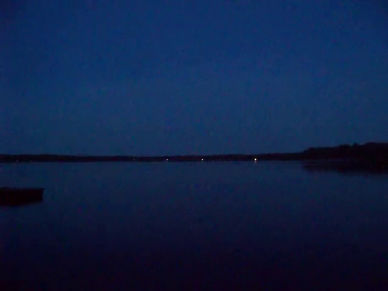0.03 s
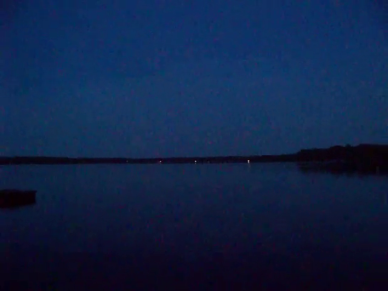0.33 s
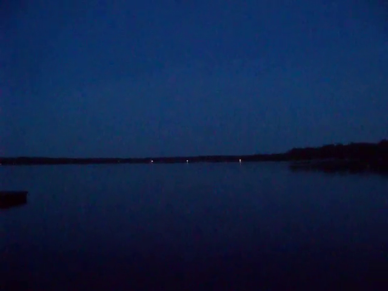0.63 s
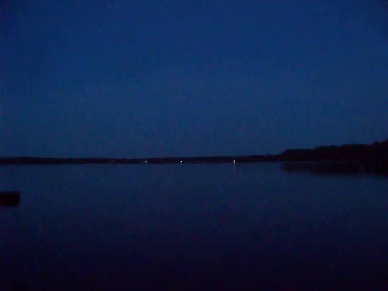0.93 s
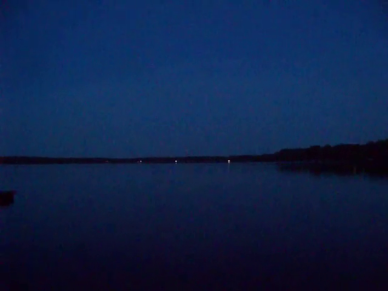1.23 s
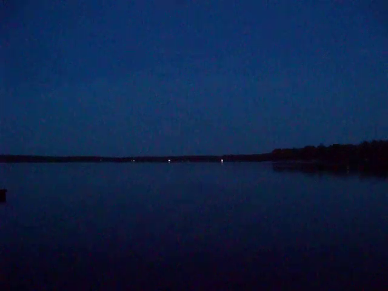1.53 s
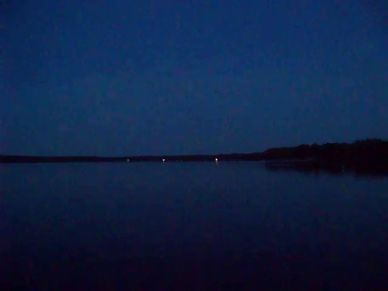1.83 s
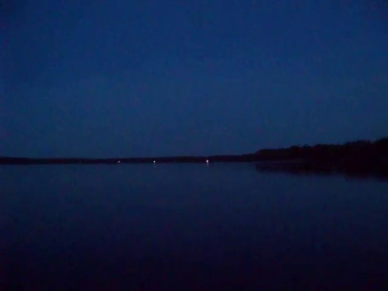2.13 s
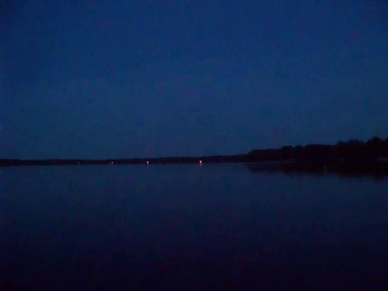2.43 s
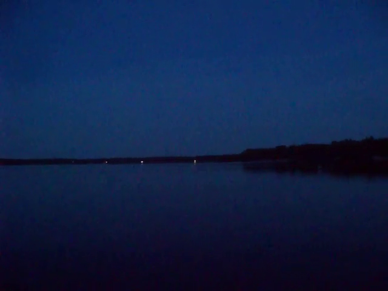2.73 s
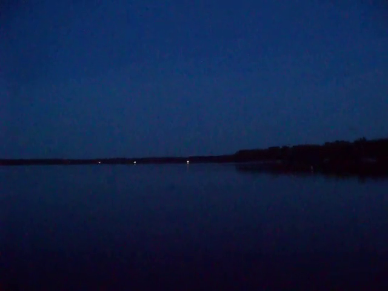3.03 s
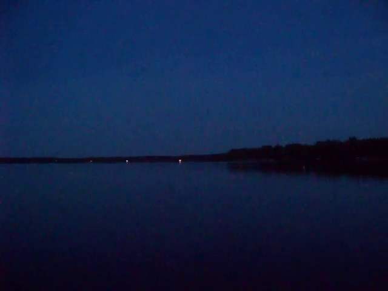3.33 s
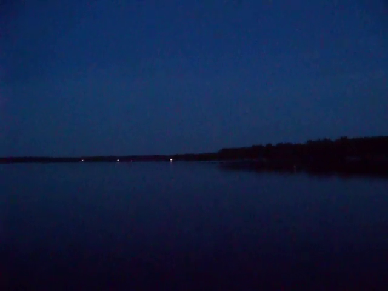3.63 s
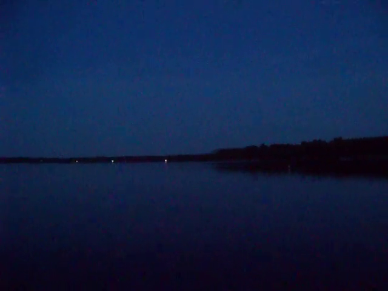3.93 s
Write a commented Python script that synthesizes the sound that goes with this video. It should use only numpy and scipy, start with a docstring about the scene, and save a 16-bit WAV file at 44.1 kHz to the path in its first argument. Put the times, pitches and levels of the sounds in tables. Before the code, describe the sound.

Two loons trade wavering calls that echo across a calm lake over faint hiss.

```python
"""A calm lake at dusk, where two loons trade tremolo calls, one pitched a little above the other.
Each call starts in a low, reedy register, then breaks upward into a nearly pure tone that warbles
about ten times a second, pitch and level sagging together. The wooded shores echo the calls
over a steady hiss, a faint hum and two small ticks."""
import sys
import numpy as np
from scipy import signal
from scipy.fft import rfft, irfft, next_fast_len
from scipy.io import wavfile
from scipy.ndimage import map_coordinates

SR = 44100
rng = np.random.default_rng(int(sys.argv[2]) if len(sys.argv) > 2 else 0)


def waveform_to_disk(signal):
    """Save audio, clipped to [-1, 1], as 16-bit WAV at the path in sys.argv[1]."""
    frames = np.transpose(np.atleast_2d(signal))
    scaled = np.clip(frames, -1, 1) * 32767
    samples = np.round(scaled).astype(np.int16)
    wavfile.write(sys.argv[1], SR, samples)


N = 176400


def amp(db):
    """Decibels to gain."""
    return 10 ** (np.asarray(db) / 20)


def unit_rms(x):
    """Scale to rms 1."""
    return x / np.sqrt(np.mean(x ** 2) + 1e-20)


def curve_at(points, hz):
    """Read (Hz, value) points on a log frequency axis."""
    point_hz, values = np.transpose(points)
    return np.interp(np.log(hz + 1), np.log(point_hz + 1), values)


def wobble(rate):
    """A smooth random curve with `rate` knots a second."""
    knots = rng.standard_normal(int(N * rate / SR) + 4)
    return map_coordinates(knots, [np.arange(N) * rate / SR])


def filtered(x, response):
    """Shape x with a response given as a function of Hz."""
    size = next_fast_len(N + SR // 2)
    return irfft(rfft(x, size) * response(np.fft.rfftfreq(size, 1 / SR)), size)[..., :N]


# Tone colour of the hiss. Each row: frequency in Hz, relative level in dB.
HISS_SPECTRUM = [(25, -7), (60, -1.5), (140, -0.5), (230, -3.5), (450, -1), (800, 1), (1500, -2.5),
                 (3000, -6), (5000, -8), (6600, -9), (7300, -13), (7900, -26.5), (8700, -35.5)]
# Stereo image of the hiss. Each row: frequency in Hz, left-right likeness (1 is mono).
HISS_LIKENESS = [(60, 0.24), (160, 0.51), (430, 0.61), (1150, 0.077), (3060, 0.43), (8190, 0.52)]


def hiss(level_db=-52.5):
    """A steady bed of noise whose stereo width varies with frequency."""
    def mid_side_gains(hz):
        width = np.arccos(np.clip(curve_at(HISS_LIKENESS, hz), -1, 1)) / 2
        return amp(curve_at(HISS_SPECTRUM, hz)) * [np.cos(width), np.sin(width)]
    mid, side = filtered(rng.standard_normal((2, N)), mid_side_gains)
    return amp(level_db) * unit_rms(np.array([mid + side, mid - side]))


def hum(hz=100, level_db=-75.5):
    """A faint low tone that wavers in pitch and level."""
    phase = 2 * np.pi * np.cumsum(hz * (1 + .012 * wobble(14))) / SR
    return np.sqrt(2) * np.sin(phase) * amp(level_db + 2.1 * wobble(5.4))


# The two ticks. Each row: start in seconds, level in dB.
TICK_CUES = [(0.061, -46.5), (3.448, -49.5)]


def ticks(t60=.0052, cutoff_hz=2540):
    """Tiny dry clicks close to the microphone: dull noise that dies at once."""
    t = np.arange(N) / SR
    envelope = sum(amp(db - 60 * np.abs(t - start) / t60) * (t >= start) for start, db in TICK_CUES)
    noise = filtered(rng.standard_normal(N), lambda hz: 1 / np.hypot(1, (hz / cutoff_hz) ** 2))
    return envelope * unit_rms(noise)


def scatter(x, t60, rise_s):
    """Diffuse reflections that build up and die away, different at each ear."""
    t = np.arange(2 * SR) / SR
    tail = rng.standard_normal((2, len(t))) * amp(-60 * t / t60) * (1 - np.exp(-t / rise_s))
    return signal.fftconvolve(x.mean(0)[None], tail / np.linalg.norm(tail[0]), axes=1)[:, :N]


def shore_echoes(bird, shores):
    """Each shore returns a slightly smeared, delayed copy of one bird's voice."""
    echoes = np.zeros((2, N))
    for delay_s, db, pan_db in shores:
        smeared = scatter(bird, t60=.035, rise_s=.00035)
        delayed = filtered(smeared, lambda hz: np.exp(-2j * np.pi * hz * delay_s))
        echoes += amp([[db + pan_db], [db - pan_db]]) * delayed
    return echoes


# Distinct shore echoes of each bird. Each row: delay in seconds, gain in dB, leftward pan in dB.
HIGH_ECHOES = [(.14, -12, 1), (.222, -13.5, -0.5), (.3, -17, -2.5)]
LOW_ECHOES = [(.15, -22, 0.0022)]
# How strongly the high bird reaches those shores. Each row: time in seconds, send gain in dB.
HIGH_ECHO_SEND = [(0, 5), (1.4, 1), (2.3, -3.5), (3.8, -2)]


def lake(high, low, absorb_hz=2160):
    """Reflections from around the water; air and trees dull the distant ones."""
    birds = high + low
    near_bank = amp(-9.5) * scatter(birds, t60=.22, rise_s=.005)
    woods = amp(-11) * scatter(birds, t60=4, rise_s=.1)
    far_end = amp(-16) * scatter(birds, t60=4.5, rise_s=.35)
    send = amp(np.interp(np.arange(N) / SR, *np.transpose(HIGH_ECHO_SEND)))
    distant = woods + far_end + shore_echoes(high * send, HIGH_ECHOES) + shore_echoes(low, LOW_ECHOES)
    return near_bank + filtered(distant, lambda hz: 1 / np.hypot(1, (hz / absorb_hz) ** 3))


# The two birds' tremolos and the low-register notes around them. Each row: start and end in seconds,
# octave overtone in dB against the tone, leftward pan in dB, list of warble crests.
# Each crest: time in seconds, pitch in Hz, level in dB.
HIGH_TREMOLOS = [ (-.03, .31, -18, -1.4, [(-.003, 1416, -37.5), (.084, 1427, -41), (.174, 1374, -38.5),
                 (.265, 1332, -42)]), (1.095, 1.46, -18.5, -0.12, [(1.143, 1369, -37.5), (1.231, 1396, -40),
                 (1.318, 1351, -38), (1.41, 1300, -44.5)]), (2.275, 2.315, -36.5, 0, [(2.215, 1140, -50),
                 (2.3, 1184, -45)]), (2.31, 2.67, -32.5, -.2, [(2.368, 1408, -34), (2.456, 1387, -33.5),
                 (2.546, 1364, -35), (2.64, 1341, -43.5)]), (3.625, 3.89, -19.5, -1.2, [(3.674, 1390, -34),
                 (3.761, 1390, -34), (3.849, 1337, -41.5)])]
LOW_TREMOLOS = [ (.525, .865, -22, -0.5, [(.512, 1340, -40), (.61, 1315, -37.5), (.709, 1315, -37),
                (.808, 1288, -37.5)]), (2.888, 3.41, -29, -1.2, [(2.878, 1330, -36), (2.976, 1326, -36.5),
                (3.069, 1343, -35.5), (3.164, 1331, -35), (3.261, 1325, -38.5), (3.364, 1227, -41)])]
REEDY_NOTES = [ (.42, .527, 0, 0, [(.418, 829, -56), (.522, 947, -49.5)]),
               (.868, .965, -1, 0, [(.818, 824, -51), (.916, 843, -47.5), (1.014, 770, -51.5)]),
               (.945, 1.09, -2.5, .5, [(.972, 920, -52.5), (1.06, 1098, -52)]),
               (2.162, 2.23, 5, 0.92, [(2.194, 925, -53), (2.295, 900, -59)]),
               (2.243, 2.283, 3.5, 1, [(2.196, 917, -46.5), (2.292, 1120, -51)]),
               (2.768, 2.892, -2, 0, [(2.788, 830, -52), (2.886, 936, -45.5)]),
               (3.458, 3.615, 0, .5, [(3.495, 960, -50.5), (3.584, 1105, -52)]),
               (3.865, 4.02, -4, -.5, [(3.858, 933, -48.5), (3.962, 831, -54)])]


def loon(calls, third_harmonic_db, dip_hz, dip_db, sharpness, fade_s=.009):
    """A whistled, slightly unsteady tone whose pitch and level sag together between the crests."""
    t, voice = np.arange(N) / SR, np.zeros((2, N))
    jitter, flutter_db = 1 + .004 * wobble(140), 2 * wobble(70)
    for start, end, octave_db, pan_db, crests in calls:
        on = (t > start) & (t < end)
        now = t[on]
        crest_s, crest_hz, crest_db = np.transpose(crests)
        # One warble from crest to crest, carrying on at the average pace beyond the outer ones.
        overhang = (now - np.clip(now, crest_s[0], crest_s[-1])) / np.mean(np.diff(crest_s))
        warbles = np.interp(now, crest_s, np.arange(len(crest_s))) + overhang
        sag = np.abs(np.sin(np.pi * warbles)) ** (2 * sharpness)
        pitch_hz = (np.interp(now, crest_s, crest_hz) - dip_hz * sag) * jitter[on]
        phase = 2 * np.pi * np.cumsum(pitch_hz) / SR
        level = amp(np.interp(now, crest_s, crest_db) - dip_db * sag + flutter_db[on])
        fade = np.clip(np.minimum(now - start, end - now) / fade_s, 0, 1)
        overtones = amp(octave_db) * np.sin(2 * phase) + amp(third_harmonic_db) * np.sin(3 * phase)
        tone = np.sin(phase) + amp(-5 * sag) * overtones  # overtones sink further in each dip
        voice[:, on] += np.sqrt(2) * level * fade * tone * amp([[pan_db], [-pan_db]])
    return voice


def scene():
    """Both birds and their echoes over the hiss, hum and ticks."""
    high = loon(HIGH_TREMOLOS, third_harmonic_db=-46, dip_hz=234.2, dip_db=8.5, sharpness=1.9)
    low = loon(LOW_TREMOLOS, third_harmonic_db=-46, dip_hz=309.6, dip_db=11.5, sharpness=1.05)
    low += loon(REEDY_NOTES, third_harmonic_db=-14.5, dip_hz=166.3, dip_db=3, sharpness=1.1)
    return hiss() + hum() + ticks() + lake(high, low) + high + low


# Dips in the microphone's response. Each row: centre in Hz, width in Hz, depth from 0 to 1.
MIC_NOTCHES = [(303, 140, .9), (988, 52, 0.6)]


def record(dry, top_hz=8791):
    """The microphone has two narrow dips and a steep band limit."""
    def response(hz):
        dips = [1 - depth * 1j * hz * width / (centre ** 2 - hz ** 2 + 1j * hz * width)
                for centre, width, depth in MIC_NOTCHES]
        return np.prod(dips, axis=0) * (hz < top_hz)
    return filtered(dry, response)


dry = scene()
out = record(dry)
waveform_to_disk(out)
```